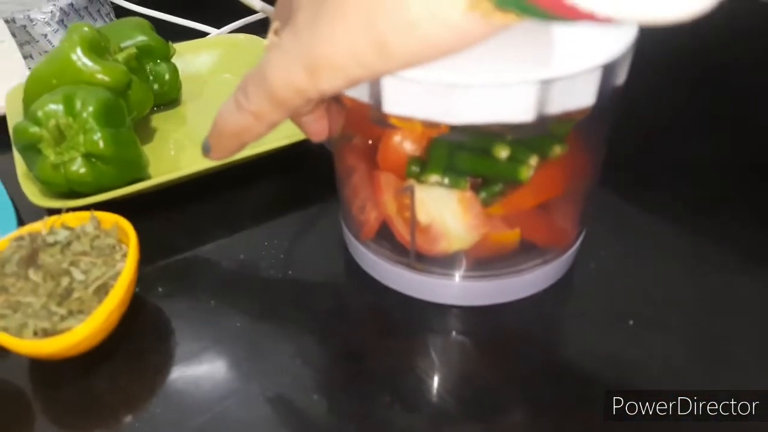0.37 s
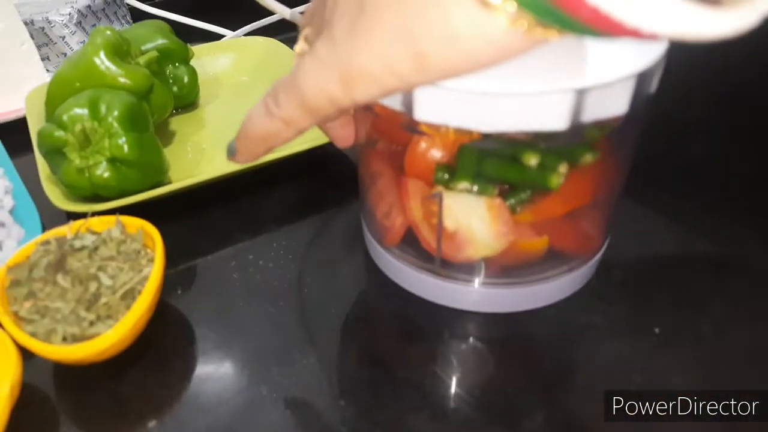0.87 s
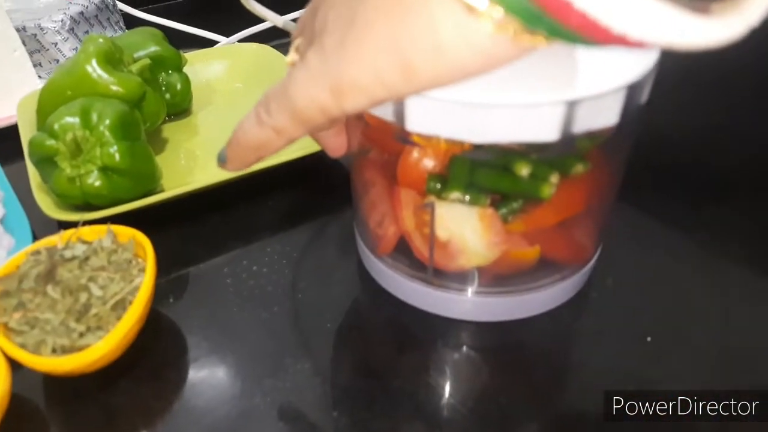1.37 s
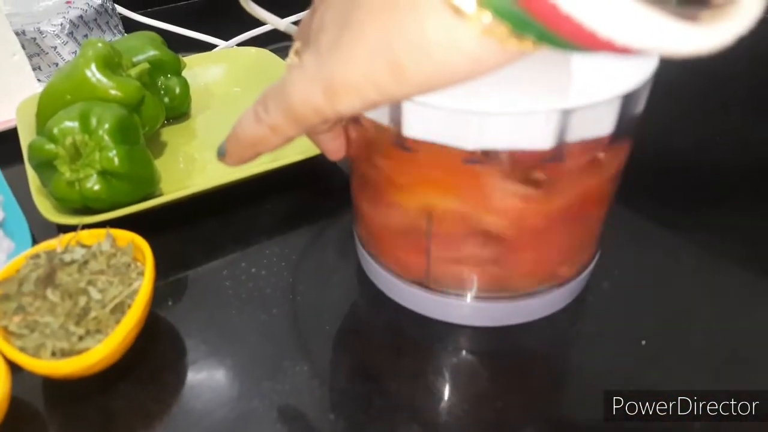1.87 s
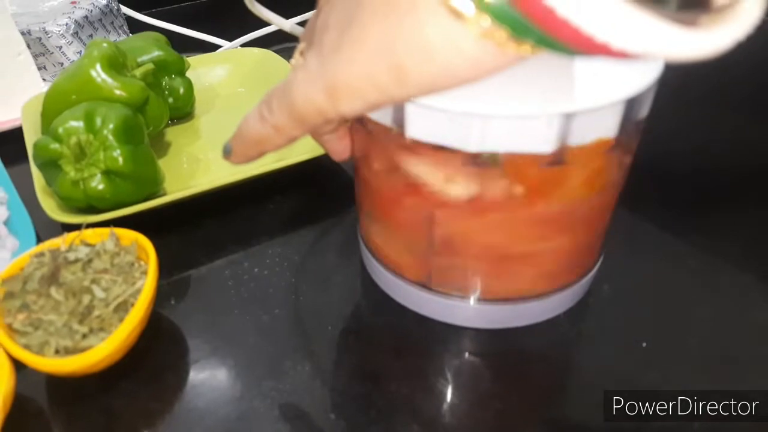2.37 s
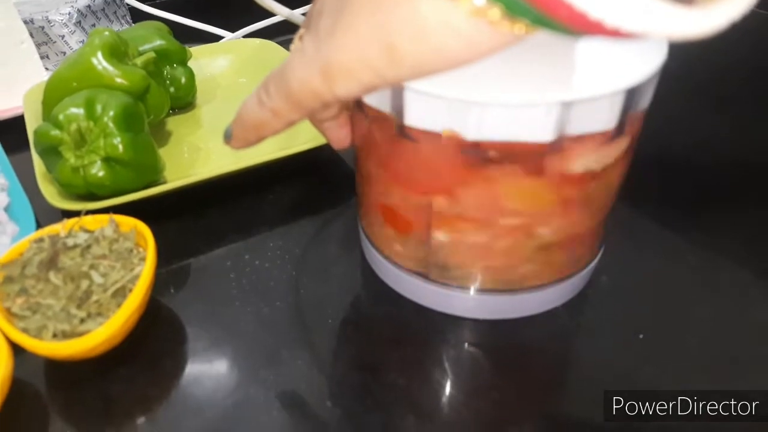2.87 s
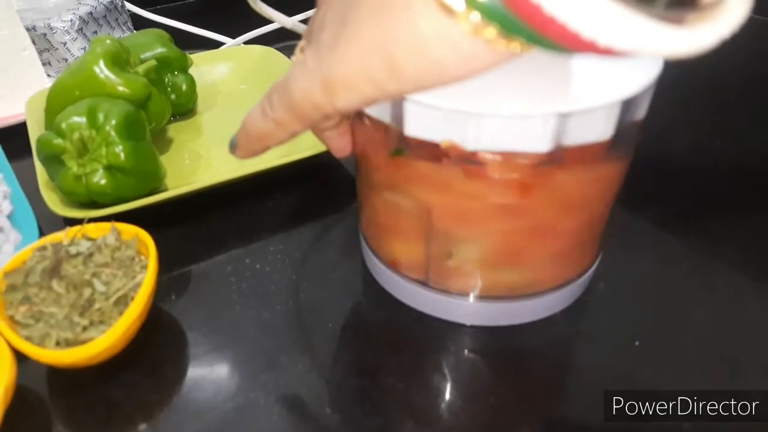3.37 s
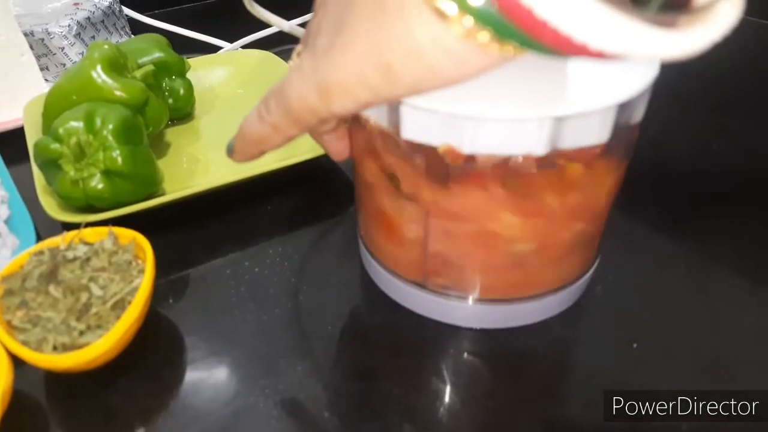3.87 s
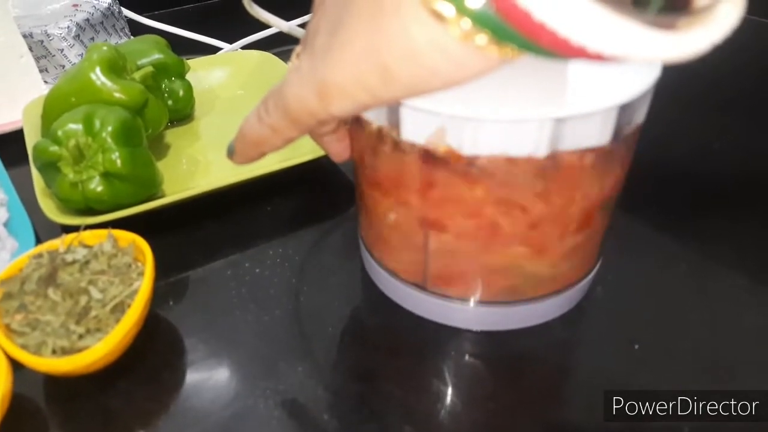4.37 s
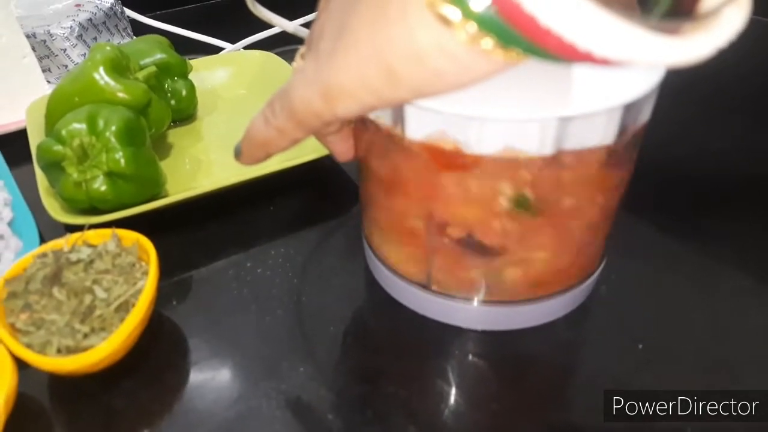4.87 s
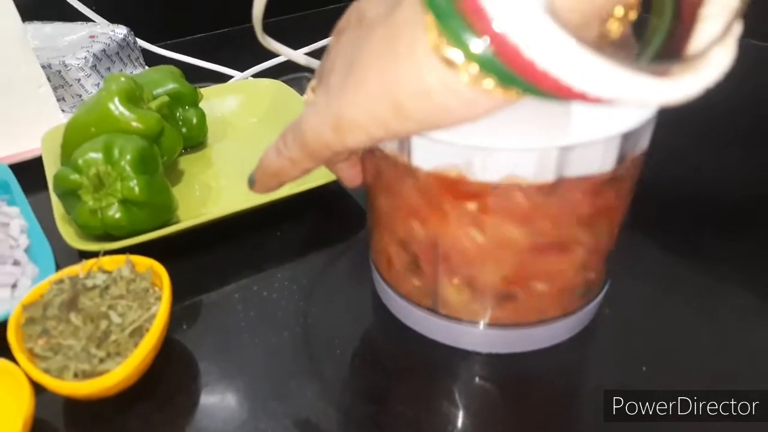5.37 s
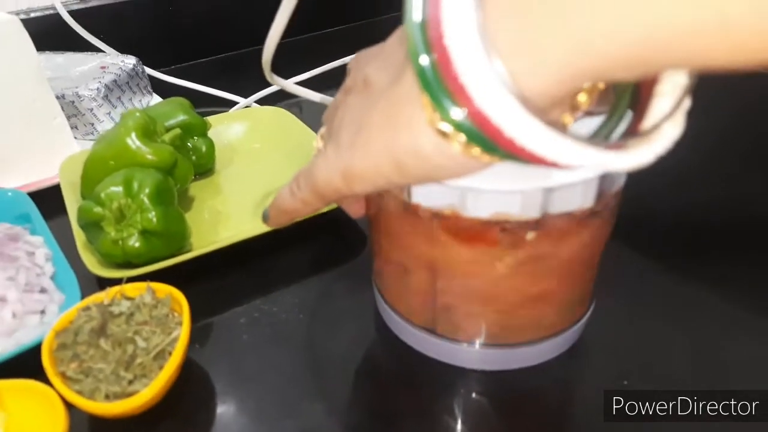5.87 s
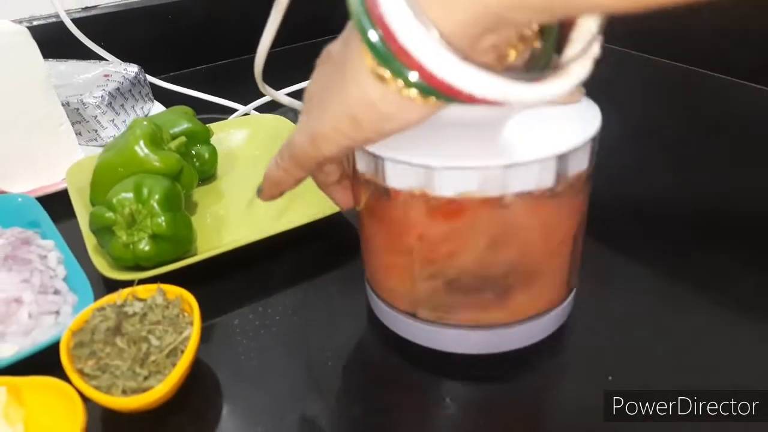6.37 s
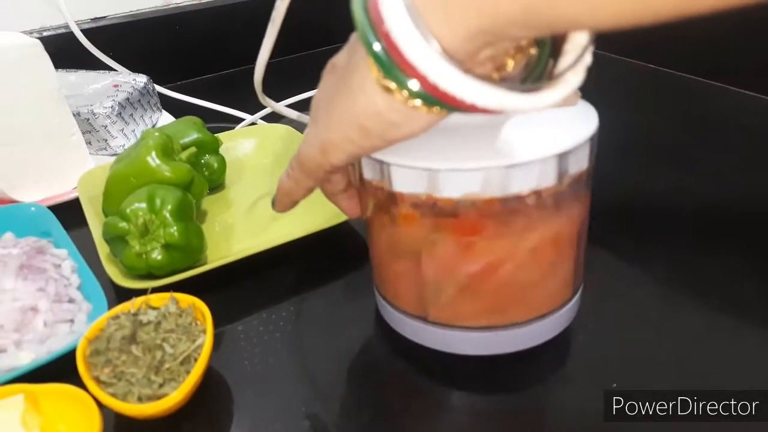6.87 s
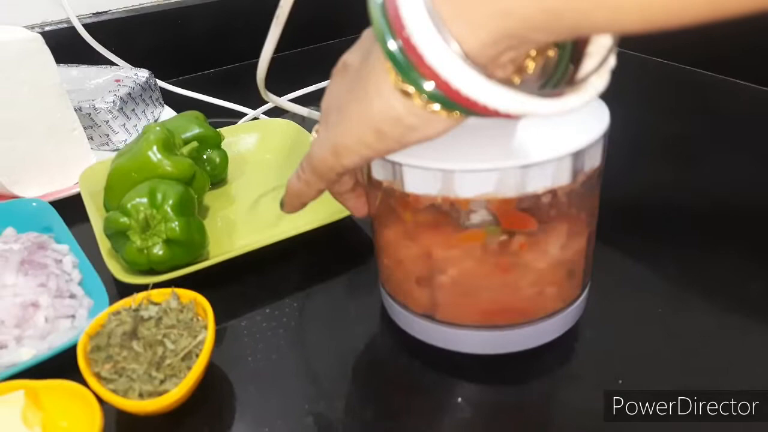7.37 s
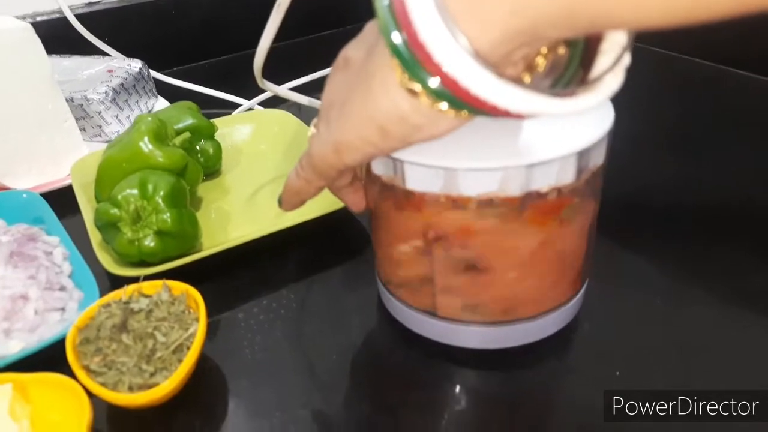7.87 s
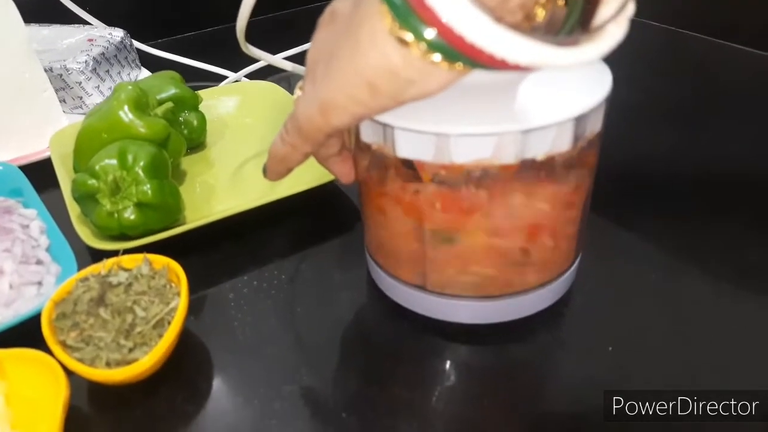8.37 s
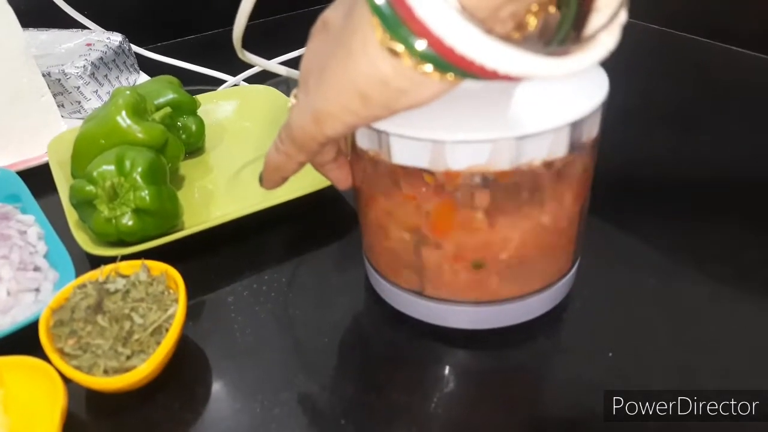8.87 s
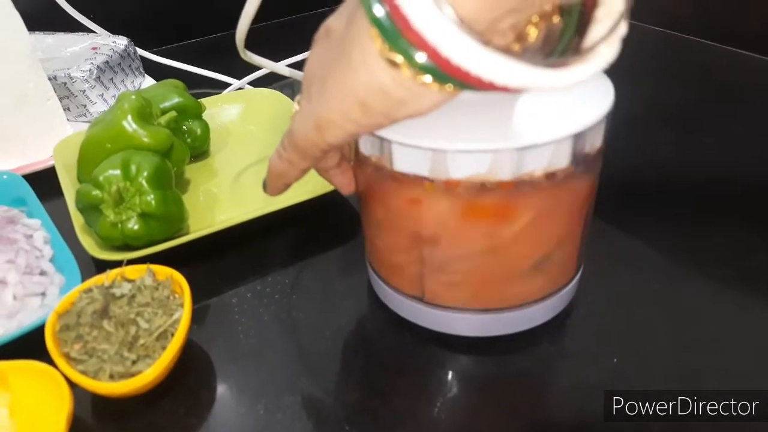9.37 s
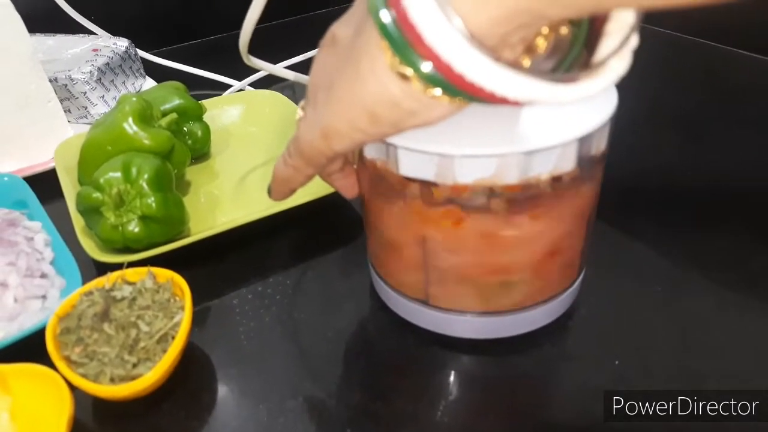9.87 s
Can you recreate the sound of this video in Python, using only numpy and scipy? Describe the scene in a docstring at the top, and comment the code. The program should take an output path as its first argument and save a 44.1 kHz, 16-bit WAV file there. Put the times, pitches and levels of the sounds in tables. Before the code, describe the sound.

After a few bright bangle clinks and a knock, a small electric chopper buzzes on and off about twice a second, crushing wet vegetables.

```python
"""Glass bangles clink over a low, patchy hum as a hand settles on a small vegetable chopper on a kitchen counter.
The hand raps the lid, then pulses the chopper fifteen times; the base chirps once as it skids.
Bangles are sums of decaying glass modes; blade blows, flying chunks and drive rattle are noise and taps
rung through the resonances of the plastic housing. Hard kitchen walls answer with diffuse decaying tails."""
import sys
import numpy as np
from scipy import signal
from scipy.fft import rfft, irfft, next_fast_len
from scipy.io import wavfile
from scipy.ndimage import uniform_filter1d

SR = 44100
rng = np.random.default_rng(int(sys.argv[2]) if len(sys.argv) > 2 else 0)


def invert_db(x):
    """Field ratio 10**(x/20) for x, a level in decibels (scalar or array-like)."""
    u = np.asarray(x, float) / 20
    return 10 ** u


def log_audio(samples):
    """Write samples as a 16-bit WAV file to the path given in sys.argv[1]."""
    # one column per channel
    frames = np.atleast_2d(samples).T
    # limit to full scale, then quantise
    limited = np.clip(frames, -1, 1)
    pcm = np.round(limited * 32767).astype(np.int16)
    wavfile.write(sys.argv[1], SR, pcm)


N = 440559  # length of the scene in samples


def evened(x):
    """Scales to rms 1."""
    return x / np.sqrt(np.mean(x ** 2) + 1e-20)


def read(points, hz):
    """Straight lines on a log-frequency axis."""
    f, value = np.transpose(points)
    return np.interp(np.log(hz + 1), np.log(f + 1), value)


def over_time(points):
    """Straight lines between (seconds, value) points, one value per sample."""
    return np.interp(np.arange(N) / SR, *np.transpose(points))


def bins(size):
    """Frequencies in Hz of the spectrum of that many samples."""
    return np.fft.rfftfreq(size, 1 / SR)


def causal(db):
    """Minimum-phase response of a gain given in dB from zero to half the sample rate."""
    log_gain = np.log(invert_db(np.concatenate([db, db[-2:0:-1]])))
    return np.fft.ifft(np.exp(signal.hilbert(log_gain).conj())).real[:len(db)]


def add(mix, s, sound):
    """Mixes a sound in at s seconds."""
    part = mix[round(s * SR):][:len(sound)]
    part += sound[:len(part)]


def clicks(per_s, spread_db):
    """Random taps of either sign; a few are large."""
    size = invert_db(spread_db * np.minimum(rng.exponential(1, N), 4))
    size *= rng.choice([-1., 1.], N)
    return evened(size * (rng.random(N) < per_s / SR))


def lumps(size):
    """Slow chance, smoothed twice over that many samples."""
    return evened(uniform_filter1d(uniform_filter1d(rng.standard_normal(N), size), size))


# How alike left and right are. Each row: frequency in Hz, likeness from -1 to 1.
LIKENESS = [(60, 0.65), (180, 0.84), (550, 0.53), (1650, -0.5), (4970, 0.028), (15000, -0.62)]


def pair(left, other, hz):
    """Two spectra as alike as two close microphone ports make them."""
    same = np.clip(read(LIKENESS, hz), -1, 1)
    return np.array([left, same * left + np.sqrt(1 - same ** 2) * other])


# Colour of the rumble. Each row: frequency in Hz, relative level in dB.
HUM_COLOUR = [(15, -75), (25, -48), (69, -18.5), (79, -12), (101, -12), (129, -16), (204, -6), (1170, -33),
              (2630, -33), (3530, -59), (3930, -45), (15500, -51)]
# Level of the rumble. Each row: time in seconds, level in dB.
HUM_LEVEL = [(1.5, -48.5), (2.1, -52)]
# Mains tone that comes and goes. Each row: time in seconds, rms level in dB.
MAINS_LEVEL = [(0.0, -57), (0.112, -52), (0.288, -80), (0.348, -52), (0.69, -51), (1.018, -70),
               (1.118, -55), (1.39, -56), (1.49, -61), (1.57, -65), (2.1, -58)]


def hum():
    """Low, patchy rumble of the house: coloured noise plus one mains sine."""
    mains_hz, patchy_spread_db = 101.5, 2.3
    hz, t = bins(size=N), np.arange(N) / SR
    noise = pair(*rfft(rng.standard_normal((2, N))), hz)
    rumble = evened(irfft(noise * invert_db(read(HUM_COLOUR, hz)), N))
    rumble_db = over_time(HUM_LEVEL) + patchy_spread_db * lumps(size=2500)
    mains = np.sqrt(2) * np.sin(2 * np.pi * mains_hz * t)
    return invert_db(rumble_db) * rumble + invert_db(over_time(MAINS_LEVEL)) * mains


# Bangles touching. Each row: start in seconds, peak in dB, lower rings over the upper in dB,
# jingle over the rings in dB, factor on the ring times.
CLINKS = [(.0256, -16.5, -26, 10, 0.86), (0.2338, -14.5, -28, 4, 1.14), (0.2536, -9.5, -22, 16, 0.71),
          (.756, -12.5, -22, 17, 0.32), (0.9663, -28.5, -18, 1, 0.67), (1.045, -12.5, -34, 1, 1),
          (1.0555, -26, -18, 6, .6), (1.066, -14.5, -22, 14, 0.56), (3.673, -40, -30, 8, .3)]
# Glass modes. Each row: frequency in Hz, level in dB, t60 in seconds before the factor of the touch.
GLASS_MODES = [(3214, 7, 0.083), (3755, 11.5, 0.079), (5870, 11.5, 0.11), (6560, -1.5, .04),
               (8400, -27, 0.03), (8400, -13, .05), (9100, -19, .07), (9180, 1.5, 0.1), (9850, -10, 0.045),
               (9800, 2, 0.059), (11300, 2, 0.13), (10680, -3.5, 0.29), (12440, 0, .05),
               (13090, -15.5, .05), (15500, -11, .06)]
# Dense short partials. Each row: frequency in Hz, level in dB.
JINGLE_COLOUR = [(1500, -35), (3000, -21), (6000, -27), (7500, -20), (8600, -6), (10000, -3), (12500, -9),
                 (15500, -2)]


def bangles():
    """Each touch rings the same glass modes, shared out a little differently, over a bright noise jingle."""
    out, t = np.zeros((2, N)), np.arange(SR // 2) / SR
    hz, db, t60 = np.transpose(GLASS_MODES)[:, :, None]
    colour = causal(read(JINGLE_COLOUR, bins(size=1024)))
    chance = rng.standard_normal((len(CLINKS), 4, len(GLASS_MODES), 1))
    noises = rng.standard_normal((len(CLINKS), 2, len(t)))
    for (s, peak_db, lower_db, jingle_db, lasting), dice, noise in zip(CLINKS, chance, noises):
        share, bend, *phases = dice
        level_db = db + 3 * share + lower_db * (hz < 7000)
        level_db = level_db - 60 * t / (t60 * max(lasting, .1))
        bent_hz = hz * (1 + 0.0034 * bend)
        jingle = evened(signal.oaconvolve(noise, colour[None])[:, :len(t)])
        for port, phase, hiss in zip(out, phases, jingle):
            rings = (invert_db(level_db) * np.sin(2 * np.pi * bent_hz * t + phase)).sum(0)
            rings += invert_db(jingle_db - 60 * t / 0.04) * hiss
            add(port, s, invert_db(peak_db) * rings / abs(rings).max())
    return out


# Colour of the rapped lid. Each row: frequency in Hz, level in dB.
KNOCK_COLOUR = [(150, -45.5), (300, -9), (500, -11), (900, -21.5), (1300, -9.5), (1700, -19), (2280, -7.5),
                (3500, -18.5), (6500, -17), (8800, -15), (15500, -21)]


def knock():
    """The hand raps the lid: a short noise burst with a few small rebounds, coloured by the lid."""
    start_s, level_db = .502, -14.5
    t, out = np.arange(SR // 8) / SR, np.zeros(N)
    lid = causal(read(KNOCK_COLOUR, bins(size=2048)))
    # (delay in seconds, peak in dB over the level)
    for late, db in ((0, 8.5), (.003, 2), (.013, -6), (.019, 3), (.027, -1.5), (.037, -7)):
        burst = np.convolve(rng.standard_normal(len(t)) * invert_db(-60 * t / 0.02), lid)
        add(out, start_s + late, invert_db(level_db + db) * burst / abs(burst).max())
    return out


# How firmly the hand presses the lid. Each row: time in seconds, grip from 0 to 1.
GRIP = [(6.2, 0.01), (6.45, 0.91), (8.5, 0.98)]


def lid_grip():
    """Grip of the hand on the lid, 0-1, at every sample."""
    return np.clip(over_time(GRIP), 0, 1)


# Pulses of the drive. Each row: start in seconds, powered time in seconds, coast to standstill in seconds,
# rattle in dB, thud of the pulp over the rattle in dB.
PULSES = [(1.58, 0.14, .33, -15.5, -7.5), (2.159, 0.19, 0.21, -18.5, -5.5), (2.715, .19, 0.25, -19, -6),
          (3.244, 0.2, 0.24, -18.5, -6), (3.777, 0.17, 0.31, -18, -7), (4.318, 0.21, 0.26, -19, -7.5),
          (4.828, .19, 0.35, -18.5, -8), (5.351, 0.21, .36, -18, -9), (5.901, 0.22, 0.33, -18.5, -9),
          (6.426, 0.1715, .4, -16, -10), (6.941, .18, .44, -16.5, -9), (7.486, 0.18, 0.43, -16.5, -9),
          (8.115, 0.15, 0.47, -15.5, -9), (8.787, 0.19, .42, -17, -9), (9.416, 0.28, 0.61, -16.5, -8.5)]


def blade(grip):
    """Speed 0-1, rattle dB and thud dB: each pulse spins up, is driven, then coasts down against friction."""
    spin_up_s, climb_db = 0.015, 1  # spins up fast, then gains slowly while powered
    bog_s, bog_wide_s, bog_db = 0.1, 0.062, -4  # pulp sliding back onto the blade bogs it for a moment
    off_db, off_s = -1, 0.024  # the drive stops rattling the pressed lid when the power goes off
    whole_db, whole_s = 8, .1  # whole vegetables thud harder early in the first pulse
    t = np.arange(N) / SR
    row = np.maximum(np.searchsorted(np.transpose(PULSES)[0], t) - 1, 0)
    start, powered, coast, rattle_db, thud_db = np.array(PULSES)[row].T
    since = np.maximum(t - start, 0)
    speed = np.clip(1 - (since - powered) / coast, 1e-3, 1)
    spin_up = 1 - np.exp(-since / spin_up_s) + 1e-3
    drive_db = 20 * np.log10(spin_up) - climb_db * np.clip(1 - since / powered, 0, 1)
    # bogging and power-off matter as far as the lid is pressed
    drive_db += grip * bog_db * np.exp(-((since - bog_s) / bog_wide_s) ** 2)
    drive_db += grip * off_db * np.clip((since - powered) / off_s, 0, 1)
    thud_db = thud_db + whole_db * (row == 0) * np.exp(-since / whole_s)
    return speed, rattle_db + drive_db, thud_db


# Housing resonances. Each row: frequency in Hz, width in Hz, level held loosely in dB, level pressed down in dB.
RESONANCES = [(111.6, 8, 12, 8), (253.5, 95, 9.5, 7), (401, 200, -8, 4.5), (644, 91, 1.5, -25),
              (1056, 184, 4, 14), (1170, 230, -4.5, 8.5), (1836, 500, 4.5, 10), (2090, 510, 5, 3.5),
              (2192, 130, 8.5, 14), (2336, 144, 2.5, 22), (2522, 274, 11.5, -10), (3560, 1080, 3, 3.5),
              (9140, 1200, 4.5, 5.5), (10850, 580, 0.5, -9)]
# Response between the resonances. Each row: frequency in Hz, level in dB.
HOUSING_SLOPE = [(25, -39), (70, -31), (150, -13), (500, -8), (1500, -9), (2800, -9), (4500, -18.5),
                 (7500, -22.5), (12500, -20.5), (15500, -30.5)]


def housing(grip):
    """Response of bowl, lid and motor cover: resonant peaks whose heights shift with the grip."""
    hz = bins(size=8192)
    power = 1
    for f, width, loose_db, firm_db in RESONANCES:
        peak_db = loose_db + grip * (firm_db - loose_db)
        power = power + invert_db(2 * peak_db) / (1 + (2 * (hz - f) / width) ** 2) ** 1.96
    return causal(read(HOUSING_SLOPE, hz) + 10 * np.log10(power))


# Level of the treble whirr. Each row: time in seconds, level over the rattle in dB.
WHIRR_LEVEL = [(1.6, -5.5), (3.5, -5), (6, -5.5), (6.6, -8.5), (9.99, -9)]
# Power of the blade speed that the amplitude follows. Columns: thud, rattle, whirr [exponents].
SPEED_POWER = (1.11, 1.287, 1.595)
# Each layer swells and sags on its own as the mash turns over. Columns: thud, rattle, whirr [dB].
CHURN_DB = (1, 2, 1.17)


def chopper():
    """Thud, rattle and whirr: noise and taps that follow the blade and ring through the housing."""
    slaps_hz, slaps_jitter, slaps_db = 59.65, 0.3023, 1.5  # rate at full speed, slows as its square root
    hz, t, grip = bins(size=N), np.arange(N) / SR, lid_grip()
    speed, rattle_db, thud_db = blade(grip)
    shaking = np.clip(0.66 + 0.56 * speed, 0, 1)  # hard shaking brings out the lid
    firmness = grip * shaking
    loose, firm = housing(0), housing(0.95)
    low = 1 / (1 + (hz / 850) ** 8)
    high = 1 / (1 + (3300 / (hz + 1)) ** 8)
    # the blade slaps mash at the pressed lid in an uneven throb
    lumps_db = 0.91 * lumps(size=200)
    slap_rate = slaps_hz * np.sqrt(speed) * (1 + slaps_jitter * lumps(size=600))
    slaps = 2 * np.pi * np.cumsum(slap_rate) / SR
    lumps_db = lumps_db + slaps_db * grip * speed * np.sin(slaps)
    out = np.zeros((2, N))
    # (band, dB over the rattle, taps a second, share of taps, left-right likeness): small parts sound from all over
    layers = ((low, thud_db, 400, .45, .97),
              (1 - low - high, 0, 1200, .35, .8),
              (high, over_time(WHIRR_LEVEL), 1800, .5, .2))
    for (band, db, per_s, grit, same), steep, churn_db in zip(layers, SPEED_POWER, CHURN_DB):
        drive = []
        for _ in "lr":
            smooth = np.sqrt(1 - grit) * rng.standard_normal(N)
            drive.append(smooth + np.sqrt(grit) * clicks(per_s, spread_db=4.0))
        drive[1] = same * drive[0] + np.sqrt(1 - same ** 2) * drive[1]
        drive = irfft(rfft(drive) * band, N) * invert_db(lumps_db + churn_db * lumps(size=800))
        held, pressed = (evened(signal.oaconvolve(drive, ring[None])[:, :N]) for ring in (loose, firm))
        rung = evened(np.sqrt(1 - firmness) * held + np.sqrt(firmness) * pressed)
        out += invert_db(rattle_db + db) * speed ** steep * rung * (t > PULSES[0][0])
    return out


# Bursts that ring bowl and lid: thrown chunks, lid chatter and throbs of the passing blade. Each row: time in
# seconds, peak in dB, tumble time in seconds.
BURSTS = [(1.859, -9, .016), (2.3003, -6.5, .016), (2.738, -13, 0.011), (3.442, -10, 0.011),
          (3.4685, -8, 0.0068), (3.801, -7, .016), (3.8942, -8, 0.0089), (4.439, -17, .016),
          (5.0056, -13, .016), (5.16, -13, .016), (5.4172, -22, .016), (5.663, -9, .016),
          (6.1106, -8, .016), (6.3296, -11.5, 0.00407), (6.499, -7, .016), (6.5555, -1, 0.0089),
          (6.568, -7, 0.0097), (6.584, -5, 0.013), (6.607, -5.5, .02), (6.617, -14, 0.011),
          (6.868, -24, 0.0082), (7.007, -8.5, 0.013), (7.043, -7, .012), (7.055, -3, .02),
          (7.122, -6, 0.013), (7.6082, -9, .016), (7.64, -2.5, .04), (8.258, -2, .06), (8.322, -5.5, .025),
          (8.848, -5.5, .016), (8.879, -8, .016), (8.938, -10, .02), (9.047, -4.5, .03), (9.1338, -7, .016),
          (9.2344, -35, 0.01), (9.3013, -32, 0.009), (9.5598, -7.5, .016), (9.5921, -5, .03),
          (9.721, -5.5, .03), (9.8027, -3, .02)]


def blows():
    """Drive catches, flying chunks and lid chatter: soft noise bursts that ring the housing as the grip shapes
    it."""
    catch_db = -3  # knock of the drive catching at each start, over the rattle
    out, grip = np.zeros(N), lid_grip()
    hits = [(s, db + catch_db, .004) for s, _, _, db, _ in PULSES] + BURSTS
    for (at, db, tumble), landing in zip(hits, rng.standard_normal((len(hits), 4000))):
        soft = np.hanning(round(np.clip(tumble, .001, .09) * SR)) ** 2  # a soft burst swells and fades gradually
        burst = uniform_filter1d(landing, size=4)[:len(soft)] * soft
        ring = np.convolve(housing(1.66 * grip[round(at * SR)]), burst)
        add(out, at - .3 * tumble, invert_db(db) * ring / abs(ring).max())
    return out


def jolt():
    """The first bite of the blade jerks the bowl on the counter: a few cycles of low, decaying sine."""
    start_s, thump_hz, level_db = 1.59, 107, -26.5  # level before the rise and decay
    t, out = np.arange(SR // 4) / SR, np.zeros(N)
    shape = invert_db(level_db - 60 * t / 0.32) * (1 - np.exp(-t / 0.0089))
    add(out, start_s, shape * np.sin(2 * np.pi * thump_hz * t))
    return out


# Rising chirp of the skidding base. Each row: time in seconds, frequency in Hz, level in dB.
SKID = [(6.255, 397, -26), (6.27, 429, -19.5), (6.288, 574, -20), (6.298, 736, -23), (6.313, 790, -36)]


def skid():
    """The base skids on the counter: a wavering, broken rising tone with a weak overtone."""
    s, hz, db = np.transpose(SKID)
    t, out = np.arange(s[0], s[-1], 1 / SR), np.zeros(N)
    waver = 1 + 0.14 * evened(uniform_filter1d(rng.standard_normal(len(t)), size=120))
    turn = 2 * np.pi * np.cumsum(np.interp(t, s, hz) * waver) / SR
    slips_db = 4.8 * evened(uniform_filter1d(rng.standard_normal(len(t)), size=200))
    tone = evened(invert_db(slips_db) * (np.sin(turn) + 0.18 * np.sin(2 * turn)))
    add(out, s[0], invert_db(np.interp(t, s, db)) * tone * signal.windows.tukey(len(t), .3))
    return signal.sosfilt(signal.butter(2, 150, "high", fs=SR, output="sos"), out)


# Decay of the room. Each row: frequency in Hz, t60 in seconds.
ROOM_DECAY = [(200, 0.22), (1000, 0.47), (3000, 0.39), (8000, 0.33), (15000, 0.2)]
# Tilt between the channels. Each row: frequency in Hz, left over right in dB.
LEFT_TILT = [(25, 6), (60, 3.5), (250, -1), (550, 2.5), (1050, -2.5), (1650, -1), (2300, 4), (3300, -1.5),
             (5000, 0), (9000, 2.5), (15000, 2)]
# The hand-held microphone drifts. Each row: time in seconds, left over right in dB.
PAN = [(0, 3), (1.5, -0.5), (6, -0.5), (9.99, -1)]


def kitchen(x, wet_db, count=3):
    """Direct sound, then diffuse tails that take turns; each band dies at its own speed."""
    tails_per_s = 25  # how fast the sound moves on to another reflection pattern
    size = next_fast_len(N + SR)
    hz, heard = bins(size), rfft(x, size)
    turn = np.arange(N) * tails_per_s / SR
    ports = np.array([[.5], [-.5]])  # half of each dB difference goes to either side
    for k in range(count):
        away = (turn - k + count / 2) % count - count / 2
        share = np.cos(np.pi / 2 * np.clip(away, -1, 1))  # squares of neighbours sum to 1
        f, t, z = signal.stft(rng.standard_normal((2, SR // 2)), SR, nperseg=256)
        decay = invert_db(-60 * t / read(ROOM_DECAY, f)[:, None])
        tail = signal.istft(z * decay, SR, nperseg=256)[1]
        tail *= np.clip(np.arange(tail.shape[1]) / SR / 0.0043, 0, 1)  # the reflections build up
        walls = pair(*rfft(tail / np.linalg.norm(tail[0]), size), hz)
        heard += rfft(x[0] * share, size) * invert_db(wet_db) * walls
    heard = irfft(heard * invert_db(ports * read(LEFT_TILT, hz)), size)[:, :N]
    return heard * invert_db(ports * over_time(PAN))


def scene():
    """All near sources share the room; bangles and knock excite it more than the chopper does."""
    hand = kitchen(bangles() + knock(), wet_db=3.5)
    machine = kitchen(chopper() + blows() + jolt() + skid(), wet_db=-4.0)
    return hum() + hand + machine


def band_limit(x):
    """A steep low-pass at the top of the band."""
    return signal.sosfilt(signal.butter(12, 16510, fs=SR, output="sos"), x)


def record(dry):
    """Microphone hiss, peaks rounded off near full scale, then a band limit."""
    hiss_db, edge_hz = -73, 15350
    x = dry + invert_db(hiss_db) * rng.standard_normal(dry.shape)
    x /= (1 + x ** 6) ** (1 / 6)
    edge = signal.firwin(255, edge_hz, window=("kaiser", 9), fs=SR)
    mix = signal.oaconvolve(x, edge[None], "same")
    return band_limit(mix)


dry = scene()
out = record(dry)
log_audio(out)
```